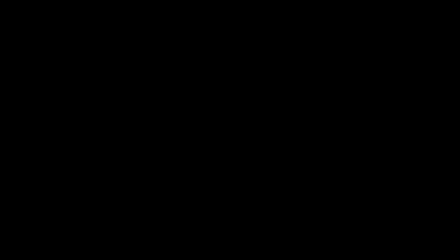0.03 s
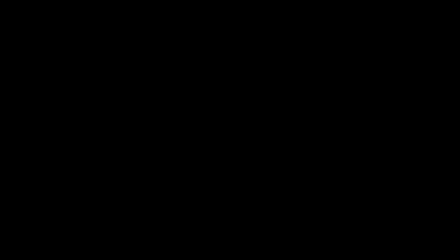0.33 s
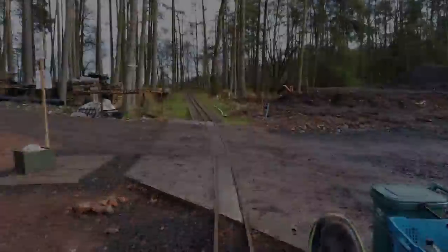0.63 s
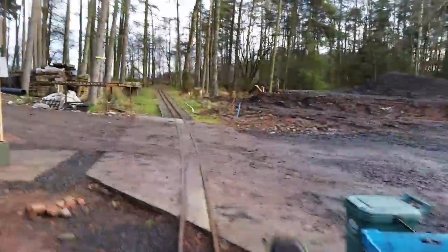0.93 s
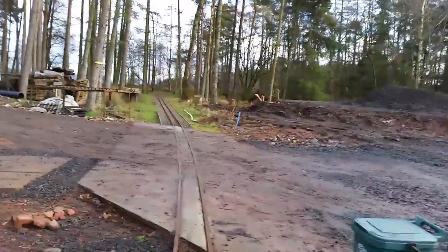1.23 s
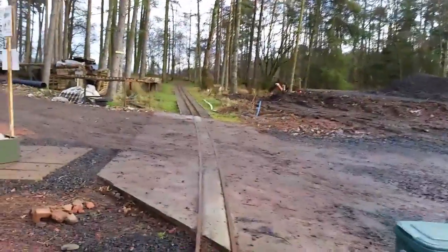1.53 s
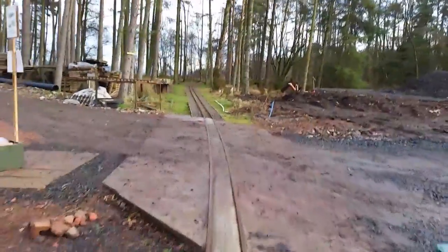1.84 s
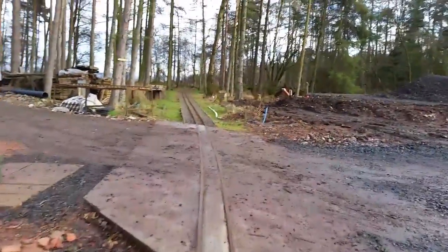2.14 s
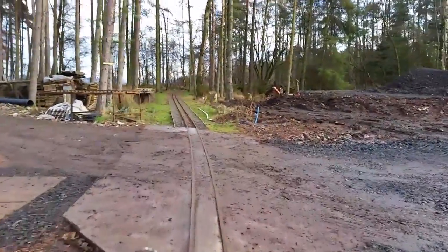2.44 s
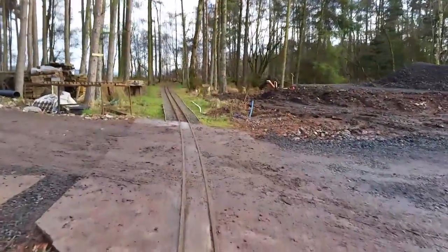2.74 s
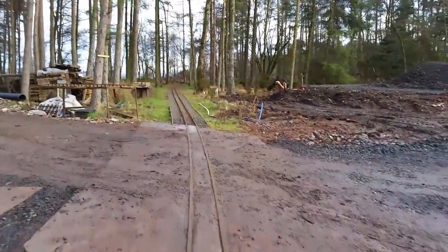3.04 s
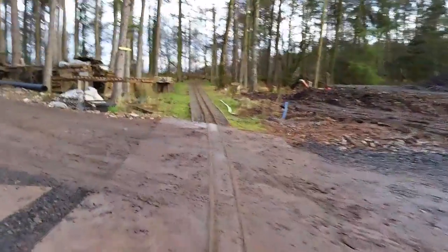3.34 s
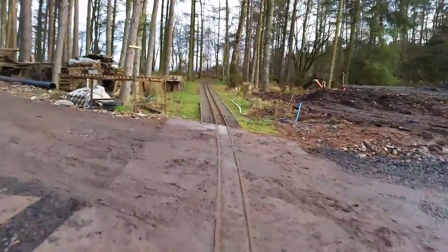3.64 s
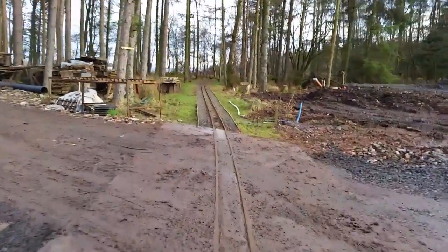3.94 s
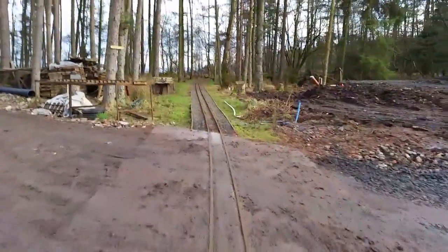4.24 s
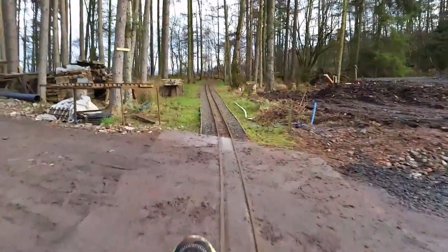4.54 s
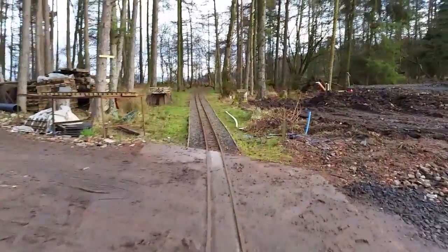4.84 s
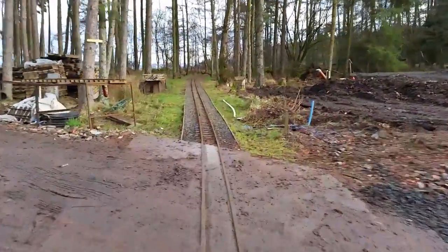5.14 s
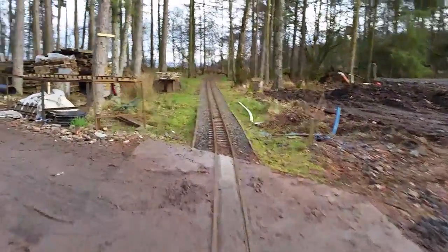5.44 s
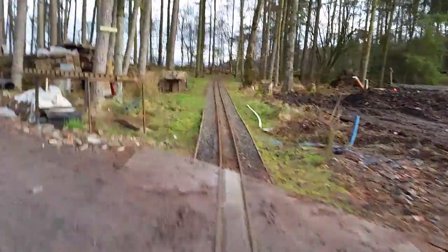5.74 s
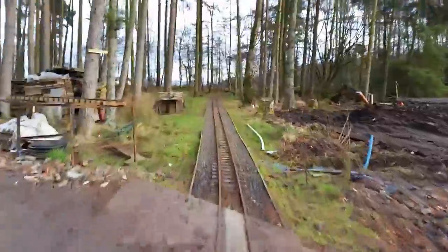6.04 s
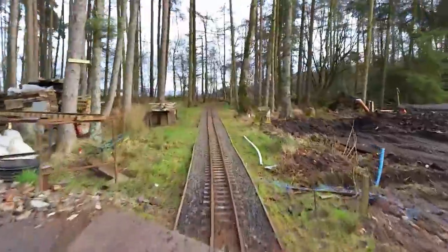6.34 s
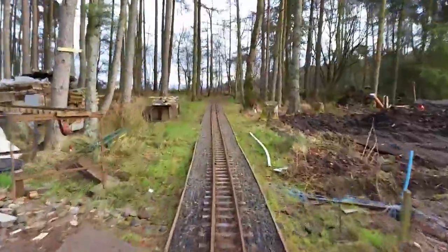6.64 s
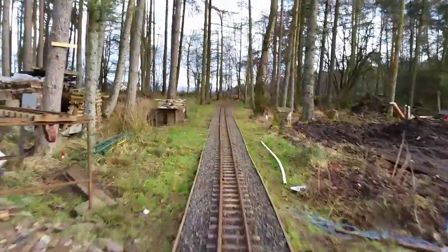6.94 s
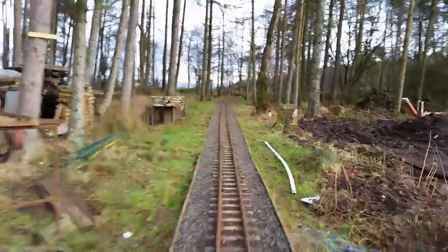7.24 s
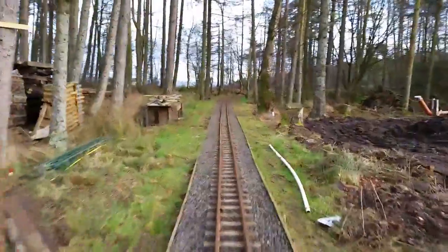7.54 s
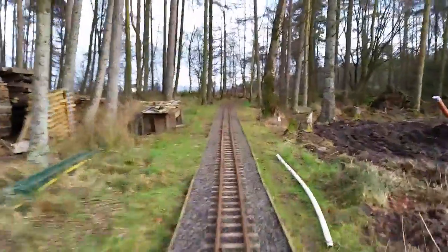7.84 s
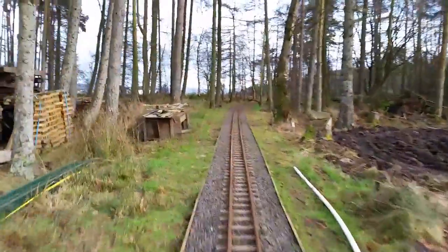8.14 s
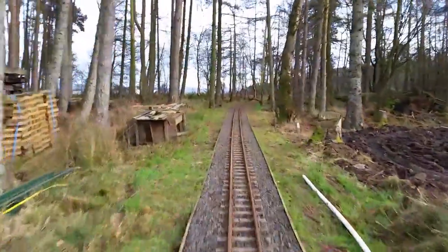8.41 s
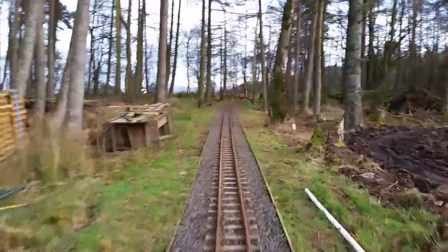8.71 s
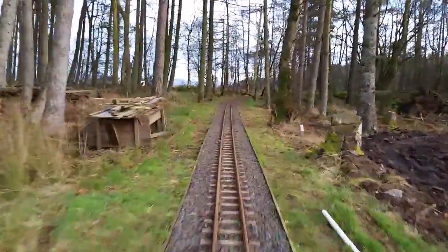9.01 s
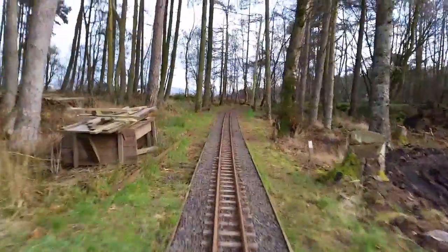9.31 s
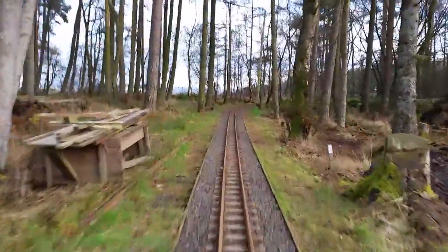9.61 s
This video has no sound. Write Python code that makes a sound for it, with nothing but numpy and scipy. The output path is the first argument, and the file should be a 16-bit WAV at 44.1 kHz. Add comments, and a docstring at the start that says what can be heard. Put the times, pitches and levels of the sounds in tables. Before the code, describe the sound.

A small engine fades in, running with a steady hum and hiss. Control levers click and scrape several times, then a miniature railway car pulls away. Its rumble grows as it gathers speed, with uneven wheel clacks, rattling loose parts, a ticking chain and brief hisses of wheel rims on the rails. The microphone rides on the car in the open air, catching a low flutter of wind.

```python
"""A miniature railway ride through a wood

A small engine runs steadily, the control levers click and rasp, and the car gathers speed.
Rough rails make its body rumble, and the wheels clack and set loose parts rattling.
The drive chain ticks, grit cracks, and the wheel rims (flanges) hiss as they rub the rails.
Air buffets the microphone with a low flutter."""
import sys
import numpy as np
from scipy import signal
from scipy.fft import rfft, irfft, next_fast_len
from scipy.io import wavfile
from scipy.ndimage import uniform_filter1d

SR = 44100
rng = np.random.default_rng(int(sys.argv[2]) if len(sys.argv) > 2 else 0)


def persist_wave(psi):
    """Save psi, clipped to +-1, as 16-bit WAV."""
    counts = np.round(np.clip(psi, -1, 1) * 32767).astype(np.int16)
    wavfile.write(sys.argv[1], SR, np.atleast_2d(counts).T)


N = 430857
TIME = np.arange(N) / SR

# Levels in the tables are relative: the functions set the final loudness.
# How alike the two ears are. Each row: frequency in Hz, likeness from 0 to 1.
EAR_LIKENESS = [(30, .8), (70, .88), (170, .985), (350, .94), (700, .65), (1400, .25), (3000, .15),
                (12000, 0)]
# Which side is louder. Each row: frequency in Hz, left minus right in dB.
EAR_BALANCE = [(60, -1.2), (210, -1.5), (500, -.5), (800, 2), (1200, 2.7), (1800, 1.5), (2700, -1.5),
               (6000, -1), (7800, 7), (9100, 9), (11000, -3.5), (13000, -4.5), (15000, -6)]
# The opening fade. Each row: time in seconds, gain.
FADE_IN = [(0.385, 0.013), (0.41, 0.042), (0.6, 0.21), (0.9, 0.53)]
# How fast the engine runs. Each row: time in seconds, turns per second.
ENGINE_SPEED = [(0.5, 66.42), (2.0, 66.45), (3.0, 66.3), (4.0, 66.1), (9.77, 65.7)]
# How fast the car goes. Each row: time in seconds, chain links per second.
TRAVEL_SPEED = [(3.0, 7.8), (4.2, 17.5), (5.5, 32), (6.8, 36.6), (7.9, 35), (9.0, 39.4), (9.77, 44.4)]

# How loud each lasting sound is along the ride. Each row: time in seconds, level in dB.
WIND_LEVEL = [(0.9, -33), (2.0, -31), (5.0, -36.5), (7.0, -34), (8.1, -37.5), (9.77, -35)]
ENGINE_LEVEL = [(0.5, 5), (1.2, 4), (2.0, 4), (2.7, 4.5), (3.2, 2), (4.2, -2), (6.0, -6), (8.0, -7.5),
                (9.77, 1.5)]
CASING_LEVEL = [(1.9, -1), (3.1, -3)]
FAN_LEVEL = [(0.5, -26), (1.9, -22), (2.9, -26.5), (3.95, -24.5), (4.2, -36), (9.77, -44)]
CHAIN_LEVEL = [(3.9, -3), (4.1, 10), (4.35, 9), (4.6, -1), (5.8, -6), (5.95, -16), (6.45, -13),
               (6.65, -0.5), (7.3, -2), (7.5, -1), (7.9, -2), (8.3, -5), (8.42, -14), (8.7, 2), (9.0, -2.5),
               (9.25, -7), (9.7, 1.5)]
RUMBLE_LEVEL = [(0.9, -34.5), (1.35, -33), (1.48, -29), (1.7, -32), (2.05, -30), (2.4, -24.5), (2.75, -30),
                (3.15, -22), (3.42, -30), (3.53, -21.5), (3.75, -19), (3.88, -22), (4.1, -15.5),
                (4.22, -23.5), (4.3, -17.5), (4.5, -14.5), (4.59, -16), (4.68, -14.5), (4.8, -17),
                (5.12, -18.5), (5.3, -13.5), (5.42, -16), (5.6, -12.5), (5.7, -22), (5.78, -13.5),
                (6.1, -15.5), (6.38, -16), (6.56, -9), (6.8, -11.5), (7.0, -10.5), (7.1, -13), (7.22, -8.5),
                (7.32, -16.5), (7.66, -12.5), (7.78, -21), (8.15, -14.5), (8.42, -11.5), (8.6, -11),
                (8.74, -18.5), (9.05, -12.5), (9.14, -16.5), (9.26, -15), (9.77, -16.5)]
TRACK_BED_LEVEL = [(0.9, -34.5), (2.9, -36.5), (3.42, -29), (3.62, -22), (4.1, -23), (4.5, -25),
                   (5.8, -21.5), (6.05, -25), (6.8, -23.5), (7.9, -26), (9.1, -18.5), (9.55, -13)]
FRAME_LEVEL = [(3.4, -27.5), (4.5, -27.5), (4.95, -20.5), (7.35, -16.5), (7.8, -25), (8.5, -32), (8.7, -22),
               (9.3, -19.5), (9.77, -29)]

# The tone colour of each noise, from low to high. Each row: frequency in Hz, level in dB.
WIND_COLOUR = [(18, -24), (32, -10), (46, -4), (70, -2), (100, -2)]
ENGINE_COLOUR = [(400, -20), (550, -14.5), (850, -17.5), (1150, -19.5), (1600, -20.5), (2300, -25.5),
                 (3100, -30), (3950, -28), (5000, -32), (6300, -37), (8900, -31.5), (10300, -30.5),
                 (11600, -28), (14000, -36), (17000, -43)]
VALVE_COLOUR = [(1200, -11), (2000, -12), (3100, -40), (4500, -28), (5700, -27), (6300, -30), (6900, -30),
                (8200, -25.5), (10000, -29), (10700, -22), (14000, -36)]
GRIT_COLOUR = [(3000, -1), (4800, 3.5), (6500, -9), (8500, -1.5), (11500, 3.5), (16000, -11)]
GRAZE_COLOUR = [(2000, -25), (4200, -13), (6500, -20), (8000, -10), (9000, -5), (10200, -5), (11700, 1.5),
                (13300, -2), (17000, -1.5)]
HARD_RUB_COLOUR = [(2000, -8.5), (4200, -8.5), (6500, -15.5), (9000, -9.5), (10200, -1.5), (11700, 4),
                   (13300, -3), (17000, -2.5)]
LEVER_CLINK_COLOUR = [(760, -3), (850, -2), (940, -2), (1100, -8), (1220, -8)]
LEVER_ARM_COLOUR = [(350, -3), (500, -12), (800, -9), (1050, -6), (1350, -7), (1720, 9), (2000, -7),
                    (2320, 1), (2650, -21), (3100, 1), (3800, 2), (6000, -12)]
LEVER_SCRAPE_COLOUR = [(1000, -6), (2400, 5.5), (4000, 2.5), (6500, 0), (9000, 2.5), (11700, 2.5),
                       (14000, 1.5), (17000, -4)]
COUPLING_COLOUR = [(700, 9.5), (1000, -15), (1300, 2), (1650, 4), (1950, 0), (2300, -14), (3200, -11)]
RUMBLE_COLOUR = [(110, -11.5), (150, -5), (195, -0.5), (260, -4), (340, -6), (420, -18.5), (560, -18.5)]
TRACK_BED_COLOUR = [(85, -9.5), (102, -4), (125, -2.5), (150, 4)]
FRAME_COLOUR = [(280, -5.5), (320, 2), (370, 0), (435, -11.5)]
JUDDER_COLOUR = [(380, -19), (460, 2.5), (540, -1.5), (660, -11.5), (760, -7)]
FITTINGS_COLOUR = [(560, -15), (680, -8), (880, 7.5), (1250, -1), (1700, -3), (2500, -15), (4200, -16.5),
                   (6500, -46), (12000, -17)]
THUMP_COLOUR = [(170, -23), (230, 9.5), (370, 6), (560, -10.5)]
KNOCK_COLOUR = [(250, 15.5), (450, 9), (700, 16.5), (950, 12), (1300, -0.5), (1800, -6), (2700, -28),
                (6000, -39)]
TICK_COLOUR = [(1000, 4), (2400, -0.5), (4000, 1), (6500, -4.5), (9000, 2.5), (11700, 7.5), (14000, -3),
               (17000, -14)]
CLANK_COLOUR = [(1000, -8), (1400, 11.5), (1800, 9), (2300, -7.5), (3300, -9), (4700, -14.5), (6000, -36)]

# The notes in each ringing sound. Each row: pitch in Hz, width in Hz (narrow is purer), level in dB.
VALVE_NOTES = [(1560, 130, -58), (2050, 60, -63), (3924, 19, -55), (4200, 250, -57), (6850, 120, -60),
               (8900, 400, -52)]
LINK_NOTES = [(3200, 360, 1.5), (4970, 390, 0), (9000, 1200, -8.5)]
SNAP_NOTES = [(3250, 500, -7), (4870, 420, -2), (8900, 703, -6)]
CLICK_RING_NOTES = [(1740, 120, -6.5), (2240, 130, -6), (2700, 130, -11), (3750, 150, -12),
                    (4860, 400, -10)]
SPRING_NOTES = [(11150, 220, -2), (11900, 250, 4.5), (13200, 500, 1.5), (15100, 800, 0)]
FITTINGS_NOTES = [(894, 81, -4), (1130, 130, -10.5), (1280, 36, -21), (1630, 300, -23)]
BODY_NOTES = [(162.1, 26, -2), (202.3, 30.4, 1), (259.6, 42.8, -7.5)]
# The hum of the engine casing. Each row: multiple of the engine speed, level in dB.
CASING_TONES = [(7, -42), (8, -51), (9, -54), (10, -53), (12, -53), (13, -51), (14, -54), (17, -61),
                (19, -60), (20, -63), (21, -59), (22, -64), (23, -59), (24, -60), (26, -59), (27, -56),
                (29, -61), (31, -67), (33, -60), (35, -67), (36, -66), (37, -67), (39, -66), (40, -67),
                (46, -68), (57, -71), (60, -66), (73, -73), (75, -74), (76, -73), (78, -74), (85, -72),
                (87, -72), (102, -71), (108, -71), (121, -67), (128, -69), (149, -68)]

# Sounds that swell and sink. Each row: middle in seconds, level in dB, length in seconds.
WIND_GUSTS = [(6.11, -18.5, 0.048)]
FLANGE_RUBS = [(2.8, -40, 0.15), (3.79, -32, 0.14), (4.56, -32, 0.14), (3.01, -38, 0.042), (4.0, -37, 0.12),
               (4.86, -37, 0.08), (5.435, -25, 0.021), (5.478, -27, 0.072), (6.055, -29, 0.069),
               (6.84, -38.5, 0.24), (7.35, -32, .05), (7.5, -39, 0.23), (8.02, -36, 0.079),
               (8.54, -37, 0.06), (9.21, -38.5, 0.29), (9.6, -28.5, 0.086)]
COUPLING_RATTLES = [(5.02, -30.5, .025), (6.75, -31.5, 0.032), (9.2, -29.5, 0.05), (9.35, -26, 0.03),
                    (9.54, -30, 0.028), (9.76, -22, 0.021)]
CHASSIS_GROANS = [(8.33, -22, 0.063), (8.7, -21, 0.19), (9.35, -18, 0.073)]
# Single sharp clicks. Each row: start in seconds, level in dB.
GRIT_CRACKS = [(3.153, -39), (3.529, -33), (4.273, -36), (4.383, -34), (5.792, -30), (5.81, -27.5),
               (5.827, -27), (6.21, -28), (6.568, -35), (6.583, -28.5), (6.674, -32), (6.702, -35),
               (7.456, -33), (7.51, -33), (7.799, -30), (7.979, -30), (8.932, -32)]
CHAIN_SNAPS = [(6.9077, -39), (7.1751, -42), (7.5687, -39), (7.5906, -41), (7.7628, -39), (7.7877, -44),
               (7.9514, -40), (8.0641, -37), (8.2261, -38), (8.2811, -39), (8.308, -45), (8.6511, -42),
               (8.7271, -39), (8.9048, -40), (8.9555, -36), (9.4744, -40), (9.5986, -39), (9.6495, -42),
               (9.6724, -40.5), (9.7, -37)]
# Levers snapping home. Each row: start in seconds, then thud, clink, knock, scrape and chink in dB.
LEVER_MOVES = [(1.872, -60, -34, -50, -40, -42), (1.888, -16.5, -24, -31, -36, -37),
               (2.214, -60, -32, -52, -37, -33), (2.238, -50, -20, -41, -43, -38),
               (2.258, -41, -17, -28.5, -28, -31), (2.477, -60, -24, -46, -43, -40),
               (2.503, -60, -27, -50, -40, -55), (2.525, -60, -32, -55, -48, -55),
               (2.554, -16.5, -20, -19.5, -25.5, -29), (2.557, -20, -18, -16.5, -29, -19.5),
               (2.627, -22, -43, -34, -16.5, -38), (2.631, -11, -37, -21, -19, -23),
               (2.854, -64, -57, -55, -34, -37)]
# Stretches of rippled rail. Each row: start and end in seconds, pitch in Hz, relative strength.
RAIL_RIPPLES = [(6.426, 7.084, 192, 1.15), (7.107, 7.313, 194, 1.5)]
# The hardest wheel blows. Each row: start in seconds, then knock, thump, tick and clank in dB.
WHEEL_BLOWS = [(3.672, -26, -17, -35, -29), (3.693, -29, -26, -59, -50), (3.727, -35, -24, -58, -55),
               (3.805, -38, -27, -60, -48), (3.886, -40, -24, -60, -57), (3.9555, -43, -23, -60, -55),
               (4.047, -24, -12, -50, -33), (4.076, -28, -14, -60, -50), (4.284, -31, -13, -62, -43),
               (4.39, -27, -10.5, -60, -50), (4.698, -19, -4.5, -39, -36), (4.73, -25.5, -28, -57, -44),
               (4.958, -29, -12.5, -36, -36), (5.021, -21, -11, -54, -41), (5.169, -24, -6.5, -38, -42),
               (5.282, -23, -9, -46, -40), (5.456, -25, -13, -55, -47), (5.557, -17.5, -7.5, -33, -46),
               (5.602, -24, -11.5, -38, -34), (5.73, -21, -8.5, -47, -41), (5.81, -32, -7, -55, -50),
               (5.831, -26, -11, -44, -25.5), (5.9342, -42, -11.5, -62, -52), (6.078, -25, -21, -37.5, -37),
               (6.183, -12.5, -6, -38.5, -22), (6.331, -33, -13, -47, -43), (6.375, -29, -23, -58, -33),
               (6.732, -20, -26, -41, -36), (6.965, -27, -16, -43, -28.5), (7.024, -25, -19, -37, -38),
               (7.134, -23, -23, -39.5, -41), (7.675, -16.5, -11, -44, -33), (7.89, -17, -9.5, -60, -33),
               (8.334, -23, -8.5, -58, -33), (8.379, -20, -10, -52, -39), (8.429, -33, -9, -63, -51),
               (8.471, -22, -16, -59, -43), (8.588, -17.5, -22, -54, -27), (8.772, -39, -12, -59, -48),
               (9.022, -21.5, -16, -37.5, -47), (9.052, -21, -13, -64, -45), (9.154, -20.5, -8, -48, -35),
               (9.229, -20, -3.5, -49, -30), (9.272, -24, -17, -55, -31), (9.364, -18.5, -14, -45, -38),
               (9.423, -15.5, -7.5, -38.5, -31), (9.514, -25, -20, -51, -42), (9.533, -31, -20, -58, -37),
               (9.617, -16, -16, -43, -37), (9.713, -22, -14, -39, -31)]


def from_db(db):
    """Turn decibels into a gain to multiply by."""
    return 10 ** (np.asarray(db) / 20)


def rms_one(x):
    """Scale a signal so that its average strength (rms) is 1."""
    return x / np.sqrt(np.mean(x ** 2) + 1e-20)


def in_time(rows):
    """Join a table's points in time with straight lines, giving a value for every sample."""
    return np.interp(TIME, *np.transpose(rows))


def at_hz(rows, hz):
    """Read a table between its frequencies, with all octaves equally wide."""
    known_hz, values = np.transpose(rows)
    return np.interp(np.log(hz), np.log(known_hz), values)


def drift(rate):
    """A smooth random wobble of about 1 either way; a higher rate wobbles faster."""
    step, warm_up = 40, 2000
    r = np.exp(-2 * np.pi * rate * step / SR)
    noise = rng.standard_normal(N // step + warm_up + 2)
    slow = signal.lfilter([1], [1, -2 * r, r * r], noise)[warm_up:]
    return np.interp(np.arange(N) / step, np.arange(len(slow)), rms_one(slow))


def white():
    """Two unrelated white noises."""
    return rng.standard_normal((2, N))


def colour(pair, spectrum=None):
    """Spread two signals over the ears at strength 1, with a tone colour if one is given."""
    size = next_fast_len(N + SR // 10)
    hz = np.maximum(np.arange(size // 2 + 1) * SR / size, 1)
    mid, side = rfft(pair, size)
    alike = np.clip(at_hz(EAR_LIKENESS, hz), -1, 1)
    ears = np.array([[1], [-1]])
    out = np.sqrt(1 + alike) * mid + ears * np.sqrt(1 - alike) * side
    out *= from_db(ears * at_hz(EAR_BALANCE, hz) / 2)
    if spectrum is not None:
        inside = np.minimum(1, np.minimum(hz / spectrum[0][0], spectrum[-1][0] / hz))
        out *= from_db(at_hz(spectrum, hz)) * inside ** 6  # falls steeply past the table's ends
    return rms_one(irfft(out, size)[:, :N])


def even(x, span_s):
    """Hold a noise at strength 1 over spans of this length."""
    power = uniform_filter1d(np.mean(x ** 2, axis=0), max(int(span_s * SR), 2))
    return x / np.sqrt(power + 1e-9)


def even_noise(spectrum, span_s, texture=1):
    """Noise roughened by a texture, given a tone colour, then evened out."""
    return even(colour(white() * texture, spectrum), span_s)


def resonate(x, hz, width_hz):
    """Make a signal ring at one pitch."""
    r = np.exp(-np.pi * width_hz / SR)
    feedback = [1, -2 * r * np.cos(2 * np.pi * hz / SR), r * r]
    return signal.lfilter(np.array([1, 0, -1]) * (1 - r * r) / 2, feedback, x + 1e-18)


def ring(notes, drive):
    """Ring several notes with a noise, spreading each over the ears at its own level."""
    return sum(from_db(db) * colour(resonate(drive, hz, width)) for hz, width, db in notes)


def ring_alternating(notes, drive):
    """Ring several notes with a noise, flipping the sign of every second one."""
    return sum((-1) ** k * from_db(db) * resonate(drive, hz, width)
               for k, (hz, width, db) in enumerate(notes))


def die_away(clicks, decay_s):
    """Give each click a tail that falls 60 dB in decay_s."""
    return signal.lfilter([1], [1, -from_db(-60 / (decay_s * SR))], clicks + 1e-18)


def jolts(per_s, spread_db, decay_s, floor):
    """Loudness curve of random, uneven bumps on top of a steady floor."""
    sizes = from_db(spread_db * np.minimum(rng.exponential(1, N), 3.5))
    contacts = die_away((rng.random(N) < per_s / SR) * sizes, decay_s)
    return rms_one(floor + rms_one(contacts))


def blows(times, levels_db, rise_s, decay_s):
    """Loudness curve of blows that rise quickly, then fall 60 dB in decay_s."""
    out = np.zeros(N)
    age = np.arange(SR // 4) / SR
    shape = np.minimum(age / rise_s, 1) * from_db(-60 * np.maximum(age - rise_s, 0) / decay_s)
    for start, db in zip(times, levels_db):
        at = int(start * SR)
        out[at:at + len(age)] += from_db(db) * shape[:N - at]
    return out


def swells(rows):
    """Loudness curve of bell-shaped swells."""
    power = np.zeros(N)
    for middle, db, length in rows:
        distance = 2 * (TIME - middle) / length
        power += from_db(db) ** 2 * 0.5 ** np.minimum(distance ** 2, 60)
    return np.sqrt(power)


def with_speed(cruise_db, doubling_db):
    """A level in dB that gains doubling_db each time the car's speed doubles."""
    cruise_links_per_s = 28
    return cruise_db + doubling_db * np.log2(in_time(TRAVEL_SPEED) / cruise_links_per_s)


def wind():
    """Air buffets the microphone with low, lumpy noise and one gust."""
    loudness = np.hypot(from_db(in_time(WIND_LEVEL) + 8), swells(WIND_GUSTS))
    return loudness * even_noise(WIND_COLOUR, span_s=0.22)


def fan(engine_speed):
    """The engine drives a cooling fan, whose blades hum at one pitch and faintly an octave up."""
    blades_per_turn = 5.868
    phase = 2 * np.pi * np.cumsum(blades_per_turn * engine_speed + 0.71 * drift(4.4)) / SR
    hum = np.sqrt(2) * (np.sin(phase) + from_db(-23) * np.sin(2 * phase))
    return hum * from_db(in_time(FAN_LEVEL) + 0.099 * drift(14))


def engine():
    """Each turn puffs hiss, shakes the casing and rattles the valves, while the fan hums along."""
    speed, level_db = in_time(ENGINE_SPEED), in_time(ENGINE_LEVEL)
    angle = 2 * np.pi * np.cumsum(speed * (1 + .0004 * drift(5))) / SR
    casing = np.zeros((2, N))
    for multiple, db in CASING_TONES:
        phase = rng.uniform(0, 2 * np.pi) + rng.uniform(0, 2 * np.pi / 3, (2, 1))
        casing += from_db(db + 2 * drift(6.4)) * np.sqrt(2) * np.sin(multiple * angle + phase)
    casing *= from_db(level_db + in_time(CASING_LEVEL))
    hiss = from_db(-39) * colour(white() * (1 + 0.15 * np.cos(angle)), ENGINE_COLOUR)
    # the valves repeat the same bright rattle on every turn
    one_turn = rng.standard_normal((2, SR // 66))
    place = (angle / (2 * np.pi) % 1 * one_turn.shape[1]).astype(int)
    buzz = from_db(-47) * colour(one_turn[:, place], VALVE_COLOUR)
    hum = fan(speed)
    whine = sum(from_db(db) * rms_one(resonate(white(), hz, width)) for hz, width, db in VALVE_NOTES)
    whine *= np.interp(TIME, [1.31, 2.6], [1, 0])  # the valves ring only while the car idles
    left, right = from_db(level_db) * (hiss + buzz + whine) + hum
    right_lag_s = 0.00025  # fan and valves sit to the left; the casing sounds all round
    return np.array([left, np.roll(right, round(right_lag_s * SR))]) + casing


def grit():
    """Grains burst under the wheels: single sharp cracks, and finer crackles in clumps."""
    times, db = np.transpose(GRIT_CRACKS)
    cracks = blows(times, db + 2, rise_s=0.0005, decay_s=0.023)
    per_s = 10 * np.interp(TIME, [3.5, 5.5], [0, 1]) * from_db(5 * drift(3))
    sizes = from_db(-40 + 4 * np.minimum(rng.exponential(1, N), 2.5))
    crackles = die_away((rng.random(N) < per_s / SR) * sizes, decay_s=0.011)
    return (cracks + crackles) * colour(white(), GRIT_COLOUR)


def flanges():
    """Wheel rims graze the rail with a bright hiss that grows with speed and flares in short rubs."""
    grain = jolts(per_s=400, spread_db=8.5, decay_s=0.029, floor=0.97)
    graze_db = with_speed(cruise_db=-42, doubling_db=4.5) + 2 * drift(17)
    grazing = from_db(graze_db) * colour(white() * grain, GRAZE_COLOUR)
    return grazing + swells(FLANGE_RUBS) * even_noise(HARD_RUB_COLOUR, span_s=0.025, texture=grain)


def chain():
    """Links tick onto a toothed wheel almost evenly, and that wheel pings once a turn."""
    wobble_db, spread_db, turns_per_link, ping_hz = 1.3, 6.5, 0.38, 9050
    links_passed = np.cumsum(in_time(TRAVEL_SPEED) * from_db(wobble_db * drift(14))) / SR
    level_db = with_speed(cruise_db=-37, doubling_db=11) + in_time(CHAIN_LEVEL)
    strength = from_db(level_db + spread_db * rng.uniform(-1, 1, N))
    # one click each time a count reaches a whole number
    link_clicks = np.diff(np.floor(links_passed), prepend=0) * strength
    turn_clicks = np.diff(np.floor(links_passed * turns_per_link), prepend=0) * strength
    ticks = die_away(link_clicks, decay_s=0.012) * rms_one(ring_alternating(LINK_NOTES, white()))
    pings = die_away(turn_clicks, decay_s=0.076) * colour(resonate(white(), ping_hz, width_hz=350))
    return ticks + from_db(-9) * pings


def chain_snaps():
    """Now and then a slack link snaps onto its tooth and rings clearly."""
    times, db = np.transpose(CHAIN_SNAPS)
    loudness = blows(times, db + 7.5, rise_s=0.00088, decay_s=0.017)
    return loudness * even(ring(SNAP_NOTES, white()), span_s=0.004)


def levers():
    """Levers scrape and knock the frame, springs chink, and each click sets off a short, bright ring."""
    times, thud_db, clink_db, knock_db, scrape_db, chink_db = np.transpose(LEVER_MOVES)
    thud = blows(times, thud_db + 6, rise_s=0.0023, decay_s=0.017)
    thud = thud * even_noise(THUMP_COLOUR, span_s=0.0051)
    frame = blows(times, thud_db - 5.5, rise_s=0.0019, decay_s=0.033)
    frame = frame * even_noise(KNOCK_COLOUR, span_s=0.0065)
    clink = blows(times, clink_db, rise_s=0.002, decay_s=0.055)
    clink = clink * even_noise(LEVER_CLINK_COLOUR, span_s=0.015)
    knock = blows(times, knock_db - 0.5, rise_s=0.00089, decay_s=0.04)
    knock = knock * even_noise(LEVER_ARM_COLOUR, span_s=0.006)
    ringing = blows(times, knock_db - 0.5, rise_s=0.0018, decay_s=0.077)
    ringing = ringing * ring(CLICK_RING_NOTES, white())
    scrape = blows(times, scrape_db + 5, rise_s=0.0036, decay_s=0.047)
    scrape = scrape * colour(white(), LEVER_SCRAPE_COLOUR)
    chink = blows(times, chink_db, rise_s=0.0029, decay_s=0.065) * ring(SPRING_NOTES, white())
    return thud + frame + clink + knock + ringing + scrape + chink


def couplings():
    """Wheel blows set the loose couplings chattering, more so at speed; a few bursts last longer."""
    times = np.transpose(WHEEL_BLOWS)[0]
    levels_db = np.interp(times, TIME, with_speed(cruise_db=-46, doubling_db=26))
    shaken = blows(times, levels_db, rise_s=0.018, decay_s=0.071)
    chatter = jolts(per_s=150, spread_db=1.5, decay_s=0.017, floor=1.0)
    loudness = np.hypot(shaken, swells(COUPLING_RATTLES))
    return loudness * even_noise(COUPLING_COLOUR, span_s=0.074, texture=chatter)


def loose_fittings(bumps):
    """Bumps rattle the loose parts, more so at speed; each part's own note comes and goes."""
    rattle = even_noise(FITTINGS_COLOUR, span_s=0.076, texture=bumps)
    for hz, width, db in FITTINGS_NOTES:
        loudness = from_db(db + 6.5 * np.clip(drift(10), -2, 1.2))
        rattle += loudness * even(colour(resonate(white() * bumps, hz, width)), span_s=0.12)
    return from_db(with_speed(cruise_db=-36.5, doubling_db=5.2)) * rattle


def chassis_judder(bumps):
    """The chassis judders more as the speed grows, and groans in short fits."""
    steady = from_db(with_speed(cruise_db=-31, doubling_db=7.6))
    loudness = np.hypot(steady, swells(CHASSIS_GROANS))
    return loudness * even_noise(JUDDER_COLOUR, span_s=0.049, texture=bumps)


def ripple_drone():
    """Ripples on the rail shake the car at one wandering pitch and weakly an octave up."""
    edge_s, wander_hz, flutter_db = 0.11, 9, 3
    out = np.zeros(N)
    for start, end, hz, strength in RAIL_RIPPLES:
        fade = np.clip(np.minimum(TIME - start, end - TIME) / edge_s, 0, 1)
        phase = 2 * np.pi * np.cumsum(hz + wander_hz * drift(24.5)) / SR
        tone = np.sqrt(2) * (np.sin(phase) + from_db(-11) * np.sin(2 * phase))
        out += strength * fade * from_db(flutter_db * drift(20)) * tone
    return out * from_db([[-.8], [.8]])  # a little to the right


def rocking():
    """A gain that surges and dips as the car rocks on the track."""
    return from_db(1.4 * np.clip(drift(6), -2, 2))


def rolling():
    """Rough rails drum the car body and the track bed, and shake the frame and loose parts."""
    under_way = np.interp(TIME, [2.7, 3.6], [0, 1])
    bumps = jolts(per_s=130, spread_db=-2, decay_s=0.039, floor=1.37)
    body = colour(ring_alternating(BODY_NOTES, white() * bumps))
    drumming = under_way * body + 0.63 * colour(white(), RUMBLE_COLOUR) + ripple_drone()
    rumble = from_db(in_time(RUMBLE_LEVEL) + 3.5) * even(drumming, span_s=0.086)
    boom = from_db(in_time(TRACK_BED_LEVEL) + 2) * even_noise(TRACK_BED_COLOUR, span_s=0.27)
    frame = from_db(in_time(FRAME_LEVEL) + 2) * even_noise(FRAME_COLOUR, span_s=0.041, texture=bumps)
    shaking = frame + chassis_judder(bumps) + loose_fittings(bumps)
    return rocking() * (rumble + boom) + under_way * rocking() * shaking


def wheel_clacks():
    """At each blow the body thumps, the frame knocks, steel ticks, the wheel clanks and fittings ring."""
    times, knock_db, thump_db, tick_db, clank_db = np.transpose(WHEEL_BLOWS)
    thump = blows(times, thump_db + .5, rise_s=0.0036, decay_s=0.11)
    thump = thump * even_noise(THUMP_COLOUR, span_s=0.02)
    knock = blows(times, knock_db + 2, rise_s=0.001, decay_s=0.055)
    knock = knock * even_noise(KNOCK_COLOUR, span_s=0.0057)
    tick = blows(times, tick_db + 9.5, rise_s=0.0021, decay_s=0.087) * colour(white(), TICK_COLOUR)
    clank = blows(times, clank_db + 2.5, rise_s=0.0021, decay_s=0.044)
    clank = clank * even_noise(CLANK_COLOUR, span_s=0.0059)
    ringing = blows(times, knock_db - 7, rise_s=0.0014, decay_s=0.094)
    ringing = ringing * even(ring(FITTINGS_NOTES, white()), span_s=0.017)
    return thump + knock + clank + tick + ringing


def scene():
    """All the sounds together, heard from the car in the open air."""
    return (engine() + rolling() + wheel_clacks() + couplings() + levers()
            + chain() + chain_snaps() + flanges() + grit() + wind())


def record(dry):
    """Fade in from silence to about half gain, round off the peaks and cut the highest treble."""
    silent_s, ceiling, cutoff_hz = 0.38, 0.92, 15750
    faded = dry * in_time(FADE_IN) * (TIME > silent_s)
    rounded = faded / (1 + (faded / ceiling) ** 8) ** (1 / 8)
    return signal.sosfilt(signal.ellip(12, .1, 90, cutoff_hz, fs=SR, output="sos"), rounded)


dry = scene()
out = record(dry)
persist_wave(out)
```